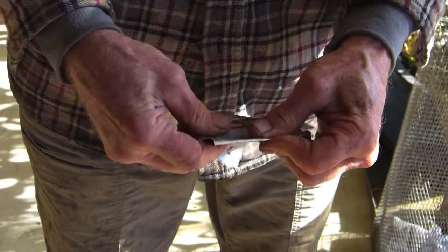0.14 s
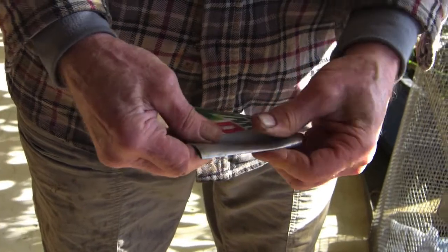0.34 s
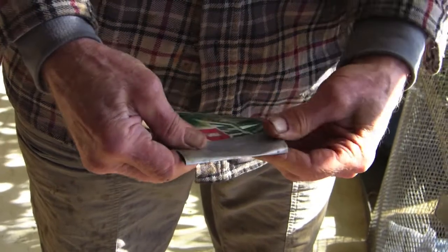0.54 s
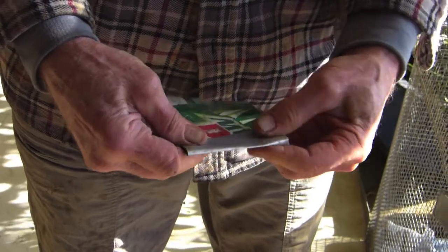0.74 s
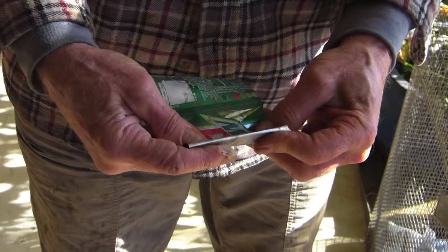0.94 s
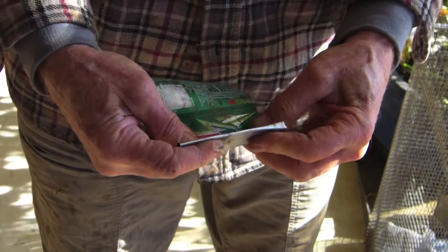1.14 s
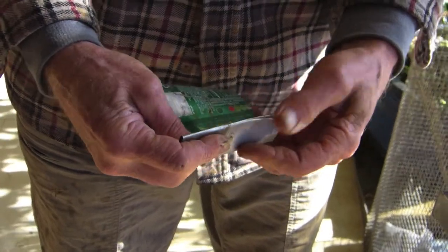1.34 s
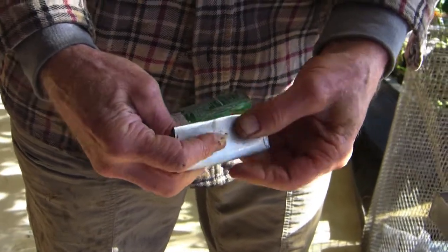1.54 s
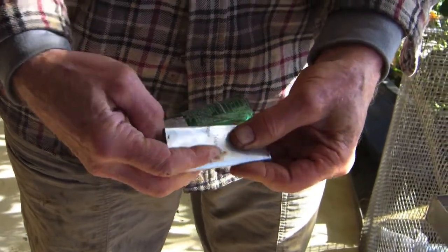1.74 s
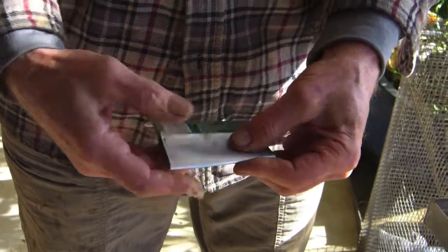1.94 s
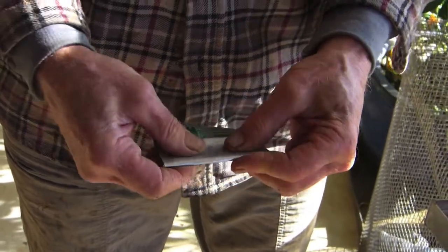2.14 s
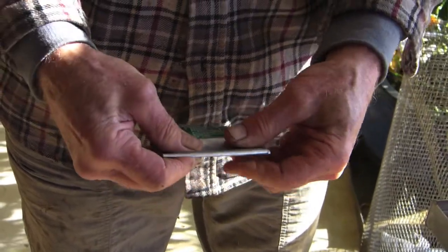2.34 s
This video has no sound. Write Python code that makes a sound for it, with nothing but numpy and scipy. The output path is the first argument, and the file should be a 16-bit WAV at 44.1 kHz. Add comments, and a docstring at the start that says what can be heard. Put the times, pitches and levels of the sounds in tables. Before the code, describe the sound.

A thin aluminium strip snaps and crackles sharply as fingers fold it, close up indoors

```python
"""Folding a strip of thin aluminium

A strip cut from a can is folded over by hand, close to the microphone in a small workshop.
The sheet buckles in short snaps: bursts of noise that excite modes of the local patch and the whole strip.
Between them fingers and metal rub (stick-slip grains over hiss), and skin and cloth brush (dull noise).
A near surface throws every sound of the hands and metal back, and the room adds a short tail
made of decaying noise, over a faint rumble of filtered noise."""
import sys
import numpy as np
from scipy import signal
from scipy.fft import rfft, irfft
from scipy.io import wavfile
from scipy.ndimage import uniform_filter1d

SR = 44100
rng = np.random.default_rng(int(sys.argv[2]) if len(sys.argv) > 2 else 0)


def log_audio(samples):
    """Write samples as a 16-bit WAV file to the path given in sys.argv[1]."""
    # one column per channel
    frames = np.atleast_2d(samples).T
    # limit to full scale, then quantise
    limited = np.clip(frames, -1, 1)
    pcm = np.round(limited * 32767).astype(np.int16)
    wavfile.write(sys.argv[1], SR, pcm)


N = 110250  # samples: 2.5 s

# Bucklings of the sheet, levels before SNAP_GAIN_DB: start_s, crack_decay_ms,
# band_level_db (six columns, one for each of CRACK_BANDS_HZ),
# ring_hz, ring_level_db, ring_width_hz, low_ring_hz, low_ring_level_db
BUCKLINGS = [ (0.2396, 0.76, 0.5, -2, 2, 6, 3.5, -13.5, 8100, 10, 900, 2034, 6.5),
             (0.3287, 0.76, -12, -8.5, -14, -12.5, -5.5, -28, 4000, 3, 300, 1690, -8),
             (0.4433, 0.83, 1.5, 4, 6, 14.5, 16.5, 3.5, 7960, 3.5, 1010, 890, -13),
             (0.6608, 5.4, -13, -2, 3, 6.5, 8, 2.5, 3690, 7, 450, 1050, 16),
             (0.7764, 0.96, -12, 1.5, 1, 4, 2.5, -13, 7600, 6.5, 500, 1370, -4),
             (0.8046, 0.77, -4.5, -6.5, 5, 12, 15.5, -2.5, 4200, -1, 300, 1600, -10),
             (1.1553, 1.15, -6.5, -7.5, -18, -15.5, -21, -30, 3690, 15.5, 297, 970, -1),
             (1.2185, 0.74, -16, -18, -20, -20, -28, -36, 3900, -6, 300, 1040, -6),
             (1.3703, 1.5, -12, -5.5, -13, -8, -28, -38, 3700, -10, 300, 850, -5),
             (1.3793, 0.99, -12, 0, 1, 14, 15.5, 2.5, 3830, 4.5, 400, 1646, 6),
             (1.4686, 1.7, -27, -16, -8, -6.5, 0, -14.5, 7500, -13, 400, 1620, -10),
             (1.5880, 1.65, 0.5, 8.5, 2, 6, 6, -6, 2050, 6.5, 120, 1060, 0.5),
             (1.6698, 0.9, -10, -13, -0.5, 0.5, -4, -33, 3070, 0, 250, 1550, -8),
             (1.7314, 2.8, -13, 1, 7.5, 8.5, 8, -15, 2886, 7, 111, 2130, 8),
             (1.7727, 4.1, -10, 3, -12, 13.5, 0.5, -17, 2797, 23.5, 90, 1503, 7),
             (1.8252, 2.7, -3.5, -2.5, 1, 0, 1.5, -17, 2870, -13, 100, 980, -21),
             (1.8595, 1.34, -6, -5.5, 8.5, 0, 14.5, -15, 4200, 9.5, 400, 1700, 2),
             (1.8953, 1.04, -11.5, -7.5, -6.5, 3, 11, -2.5, 3940, 14, 430, 890, -18),
             (2.0552, 1.8, 1.5, -3, 12, 10.5, 15.5, 3.5, 3870, 0, 345, 1436, 15.5),
             (2.1761, 1.7, 3.5, -4.5, -1, -0.5, -3.5, -26, 3100, -8, 250, 1230, 0),
             (2.2353, 1.36, -11, -9, -2, 4.5, 10, -13.5, 3700, -7, 300, 1540, -2),
             (2.4073, 1.9, -36, -49, -25, -21, -8.5, -19.5, 8000, 0, 600, 1500, -20),
             (2.4425, 0.41, -23, -6, 0, 1.5, -7.5, -45, 3900, 0, 400, 1600, -4.5),
             (2.4955, 2, -2.5, -10, -21, -35, -28, -33, 3800, -10, 400, 850, -6)]
# Centres of the bands that colour a crack: centre_hz
CRACK_BANDS_HZ = [750, 1500, 2650, 4600, 7600, 12000]
# Modes of the whole strip, touched by every snap: mode_hz, mean_level_db (over the crack), width_hz
STRIP_MODES = [(790, 1, 29), (980, 1, 32), (1380, -5.5, 54), (1574, -3, 98), (1966, -11.5, 120),
               (2842, 4, 49), (2610, -15, 38), (2985, -4, 180), (3500, -1.5, 86), (3800, -6.5, 246),
               (3970, -5.5, 74), (4220, -20, 18), (4638, -24, 43), (4746, 1, 59), (5330, -8, 37),
               (5644, -19.5, 21), (6702, -26, 35), (7830, -6, 120), (8470, -4.5, 97), (8463, -21, 39)]
# Rubbing of fingers and metal, before RUB_GAIN_DB: time_s, level_db
RUB_LEVELS = [(0, -37.5), (0.084, -38), (.13, -59.5), (.2, -46), (.33, -46), (.39, -48), (.43, -40.5),
              (.5, -41.5), (.75, -48), (0.932, -40), (1.02, -57.5), (1.1, -56.5), (1.18, -39.5),
              (1.25, -47.5), (1.28, -40), (1.33, -45.5), (1.55, -48), (1.72, -38), (1.96, -51),
              (2.2, -42.5), (2.338, -52), (2.39, -48), (2.5, -50.5)]
# Spectrum of the rubbing, relative: frequency_hz, level_db
RUB_SPECTRUM = [(200, -45), (500, -24), (900, -12), (1570, -5.5), (2600, -11), (3860, 1.5), (5300, -4),
                (7670, 2), (11000, -8), (13600, -26), (16000, -50)]
# Brushing of skin and sleeves as the grip shifts, before BRUSH_GAIN_DB: time_s, level_db
BRUSH_LEVELS = [(0, -52), (.12, -65), (.3, -58), (.55, -54), (.72, -51), (.93, -45), (1.06, -60.5),
                (1.2, -45.5), (1.3, -59), (1.52, -68), (1.75, -55), (1.98, -60), (2.2, -40.5), (2.36, -77),
                (2.5, -50)]
# Spectrum of the brushing, relative: frequency_hz, level_db
BRUSH_SPECTRUM = [(100, -25), (250, -7), (500, -11.5), (850, 1.5), (1200, -7), (1600, -0.5), (2200, -2.5),
                  (3500, -12), (8000, -19), (16000, -53)]
# Near reflections: delay_ms, level_db, left_lag_ms (left behind right)
REFLECTIONS = [(3.85, -5.5, 0.016), (4.7, -12, -0.011), (9.7, -13, .015), (13.2, -12, -0.042)]
# Tail of the room, levels before ROOM_GAIN_DB: centre_hz, level_db, t60_s, side_level_db (against mid)
ROOM_BANDS = [(120, -29, 0.55, -6), (400, -6, .42, 7), (850, 2, 0.4, -5), (1700, 0.5, 0.45, -3.5),
              (3780, -1.5, 0.27, -10), (5870, 0, 0.34, -21), (9200, -3, 0.25, 1.5), (11700, -7, .25, -4),
              (15300, -35, 0.085, -15)]
# Spectrum of the background rumble, relative: frequency_hz, level_db
RUMBLE_SPECTRUM = [(15, 9.5), (30, -34), (60, -23.5), (95, -8.5), (130, -1), (200, -5.5), (400, -7),
                   (900, -8.5), (2200, -23.5), (6000, -18), (12000, -29), (16000, -39)]

RUB_GAIN_DB, BRUSH_GAIN_DB, SNAP_GAIN_DB, ROOM_GAIN_DB = -3.5, -6.5, 1.5, -2
GRAINS_PER_S, GRAIN_SPREAD_DB = 3000, 3.0
RUB_HISS_DB = 4.5  # against the grains
RUMBLE_DB, RUMBLE_SIDE_DB = -58, -3  # side against mid

# Skirts below and above the bands of a crack
BASS_HZ, BASS_DROP_DB, TOP_HZ, TOP_DROP_DB = 334, 24.5, 15400, 18.5
CRACK_RISE_MS = 0.11
MODE_SPREAD_DB = 2.5  # standard deviation: every fold strikes the strip differently
LOW_RING_Q = 13.2
THUMP_DB, THUMP_HZ = -21, 43  # level against the strongest band of the snap
SNAP_SIZE, ROOM_SIZE = 8192, 2 ** 15  # samples

ECHO_SCATTER_MS, ECHO_SCATTER_DB = 1, 7.5  # decay constant of the smear; its level against the bounce
ROOM_ONSET_MS = 1.33

OVERLOAD = 0.85  # clipping level, full scale 1
LOPSIDED = 0.025  # share of the squared signal: gives the hardest snaps a low pop
CUTOFF_HZ, OFFSET = 16100, -0.0033


def from_db(db):
    """Decibel definition: amplitude gain is ten to the power of level over twenty."""
    return 10 ** (np.asarray(db) / 20)


def rms_one(x):
    """Normalisation of power: scale to unit rms."""
    return x / np.sqrt(np.mean(x ** 2) + 1e-20)


def bins(size):
    """Discrete Fourier frequencies in Hz, with zero raised to 1 so that logarithms exist."""
    return np.maximum(np.fft.rfftfreq(size, 1 / SR), 1)


def at_hz(points, hz):
    """Interpolation of (frequency, value) points along a logarithmic frequency axis."""
    point_hz, value = np.transpose(points)
    return np.interp(np.log(hz), np.log(point_hz), value)


def over_time(points):
    """Linear interpolation of (time, value) points at every sample."""
    return np.interp(np.arange(N) / SR, *np.transpose(points))


def coloured(x, points):
    """Spectral shaping: filter a noise to the given relative levels, then set its rms to 1."""
    spectrum = rfft(x) * from_db(at_hz(points, bins(N)))
    return rms_one(irfft(spectrum, N))


def mid_side(mid, side):
    """Mid-side addition: the side enters left and right with opposite sign."""
    return mid + side * np.array([[1], [-1]])


def rubbing():
    """Stick-slip friction: dense grains of random size and sign over a hiss, as strong as the slide."""
    size_db = GRAIN_SPREAD_DB * np.minimum(rng.exponential(1, N), 5)
    sizes = from_db(size_db) * rng.choice([-1, 1], N)
    grains = rms_one(sizes * (rng.random(N) < GRAINS_PER_S / SR))
    hiss = from_db(RUB_HISS_DB) * rng.standard_normal(N)
    return from_db(over_time(RUB_LEVELS) + RUB_GAIN_DB) * coloured(grains + hiss, RUB_SPECTRUM)


def brushing():
    """Soft friction: skin and cloth give a smooth, dull noise."""
    noise = coloured(rng.standard_normal(N), BRUSH_SPECTRUM)
    return from_db(over_time(BRUSH_LEVELS) + BRUSH_GAIN_DB) * noise


def rumble():
    """Stationary background noise: a shared mid and an opposed side, filtered together."""
    mid, side = rng.standard_normal((2, N))
    noise = mid_side(mid, from_db(RUMBLE_SIDE_DB) * side)
    return from_db(RUMBLE_DB) * coloured(noise, RUMBLE_SPECTRUM)


def scattered(size):
    """Scattering from an uneven surface: a clean bounce and a brief smear, of unit energy together."""
    ms = np.arange(200) * 1000 / SR
    smear = rng.standard_normal(len(ms)) * np.exp(-ms / ECHO_SCATTER_MS)
    bounce = from_db(ECHO_SCATTER_DB) * smear / np.linalg.norm(smear) + (ms == 0)
    return rfft(bounce / np.linalg.norm(bounce), size)


def near_reflections():
    """Superposition of delayed paths: direct sound plus reflections, slightly offset between channels."""
    f = bins(ROOM_SIZE)
    response = 1  # the direct sound
    for delay_ms, db, left_lag_ms in REFLECTIONS:
        arrival_ms = delay_ms + left_lag_ms * np.array([[0.5], [-0.5]])
        delay = np.exp(-2j * np.pi * f * arrival_ms / 1000)
        response = response + from_db(db) * scattered(ROOM_SIZE) * delay
    return irfft(response)


def room_tail():
    """Diffuse reverberation: noise that decays exponentially at its own rate in each band."""
    t, f = np.arange(ROOM_SIZE) / SR, bins(ROOM_SIZE)
    centres = [row[0] for row in ROOM_BANDS]
    side_db = at_hz([(row[0], row[3]) for row in ROOM_BANDS], f)
    mid, side = rfft(rng.standard_normal((2, ROOM_SIZE)))
    diffuse = mid_side(mid, side * from_db(side_db))
    tail = 0
    for weights, (_, db, t60_s, _) in zip(np.eye(len(ROOM_BANDS)), ROOM_BANDS):
        # Each band fades out at the centres of its neighbours
        band = irfft(diffuse * at_hz(list(zip(centres, weights)), f))
        unit_energy = np.sqrt(2 * np.log(1000) / (t60_s * SR))
        tail = tail + from_db(db - 60 * t / t60_s) * band * unit_energy
    onset = 1 - np.exp(-(1000 * t / ROOM_ONSET_MS) ** 2)
    return from_db(ROOM_GAIN_DB) * tail * onset


def workshop(x):
    """Convolution with a room response, redrawn at each call: the paths differ as the hands move."""
    tail = room_tail()
    return signal.fftconvolve(x[None], near_reflections() + tail, axes=1)


def causal(db):
    """Minimum-phase principle: folding the cepstrum of the given levels lets nothing sound early."""
    cepstrum = irfft(np.log(from_db(db)))
    half = len(cepstrum) // 2
    cepstrum[1:half] *= 2
    cepstrum[half + 1:] = 0
    return np.exp(rfft(cepstrum))


def resonance(f, hz, width_hz):
    """Damped harmonic resonance: the response of one mode, with gain 1 at its peak."""
    return 1 / (1 + 1j * (f * f - hz * hz) / (f * width_hz))


def crack(decay_ms):
    """Impulsive slip noise: spectrum of a rising and decaying burst, evened out to unit level."""
    ms = np.arange(SNAP_SIZE) * 1000 / SR
    envelope = (1 - np.exp(-ms / CRACK_RISE_MS)) * np.exp(-ms / decay_ms)
    slips = rfft(rng.standard_normal(SNAP_SIZE) * envelope)
    return slips / np.sqrt(uniform_filter1d(abs(slips) ** 2, size=120))


def strip_modes(f):
    """Modal superposition: the crack itself plus the modes of the whole strip, struck unevenly."""
    response = 1
    for hz, db, width_hz in STRIP_MODES:
        struck_db = db + MODE_SPREAD_DB * rng.standard_normal()
        response = response + from_db(struck_db) * resonance(f, hz, width_hz)
    return response


def snaps():
    """Snap-through buckling: each crack rings its patch of metal and the strip, then the room."""
    f = bins(SNAP_SIZE)
    out = np.zeros((2, N + SNAP_SIZE + ROOM_SIZE))
    fade = np.clip(3 - 4 * np.arange(SNAP_SIZE) / SNAP_SIZE, 0, 1)
    for start_s, decay_ms, *band_db, ring_hz, ring_db, width_hz, low_hz, low_db in BUCKLINGS:
        bass = (BASS_HZ, band_db[0] - BASS_DROP_DB)
        top = (TOP_HZ, band_db[-1] - TOP_DROP_DB)
        colour = causal(at_hz([bass, *zip(CRACK_BANDS_HZ, band_db), top], f))
        ring = from_db(ring_db) * resonance(f, ring_hz, width_hz)
        low_ring = from_db(low_db) * resonance(f, low_hz, low_hz / LOW_RING_Q)
        metal = crack(decay_ms) * colour * strip_modes(f) * (1 + ring + low_ring)
        # Faint low thump of the microphone under each snap
        thump = from_db(max(band_db) + THUMP_DB) * resonance(f, THUMP_HZ, THUMP_HZ)
        heard = workshop(irfft(metal + thump) * fade)
        start = int(start_s * SR)
        out[:, start:start + heard.shape[1]] += heard
    return from_db(SNAP_GAIN_DB) * out[:, :N]


def scene():
    """Linear superposition: the strip and the hands in the room, over the background."""
    hands = workshop(rubbing() + brushing())[:, :N]
    return rumble() + hands + snaps()


def record(dry):
    """Nonlinearity at the peaks: they clip and bend unevenly; the top is cut and a small offset added."""
    held = np.clip(dry, -OVERLOAD, OVERLOAD)
    bent = held + LOPSIDED * held ** 2
    top_cut = signal.ellip(10, 0.1, 70, CUTOFF_HZ, fs=SR, output="sos")
    return signal.sosfilt(top_cut, bent) + OFFSET


dry = scene()
out = record(dry)
log_audio(out)
```